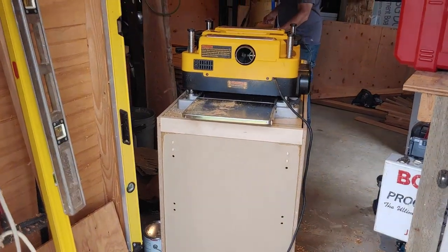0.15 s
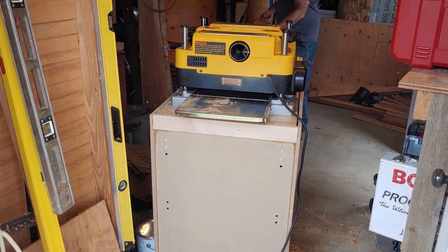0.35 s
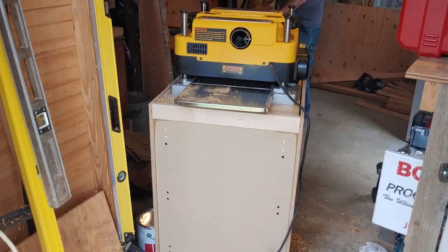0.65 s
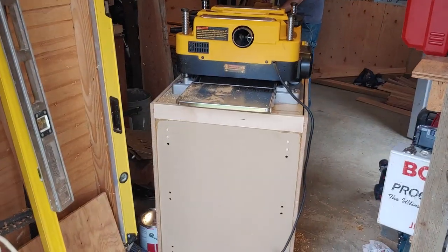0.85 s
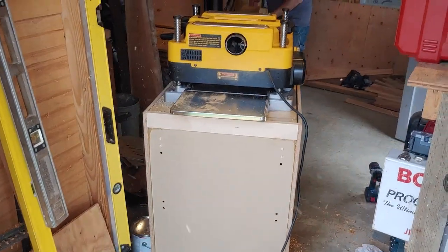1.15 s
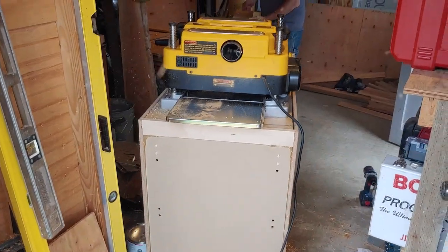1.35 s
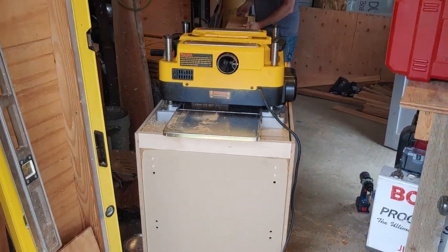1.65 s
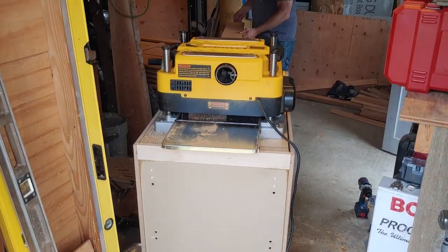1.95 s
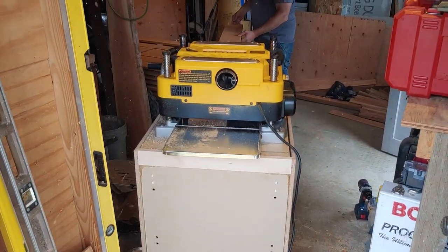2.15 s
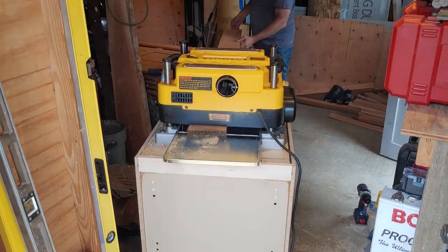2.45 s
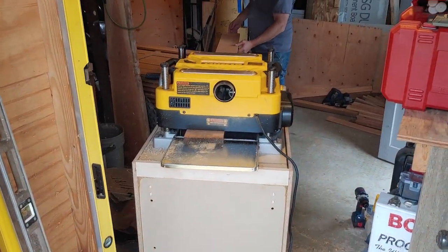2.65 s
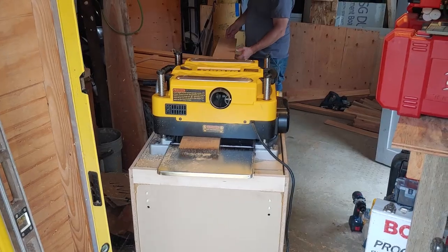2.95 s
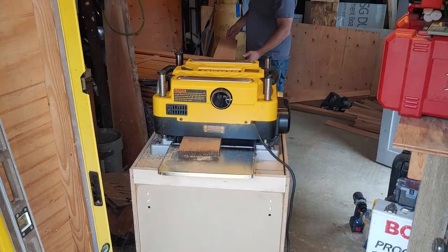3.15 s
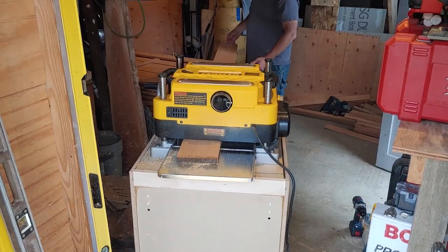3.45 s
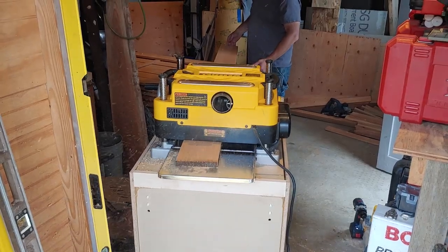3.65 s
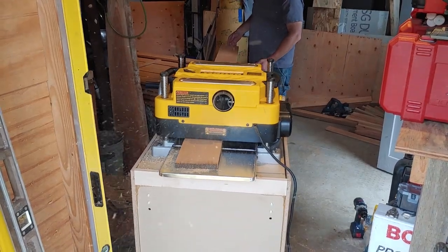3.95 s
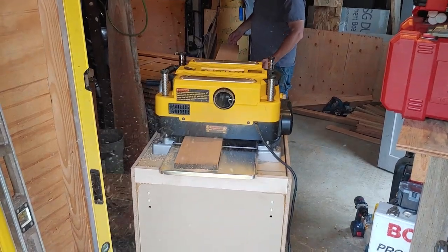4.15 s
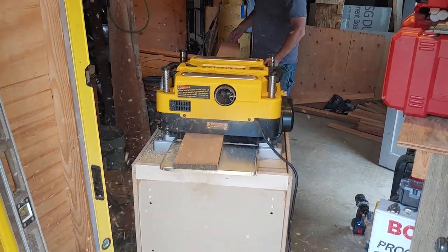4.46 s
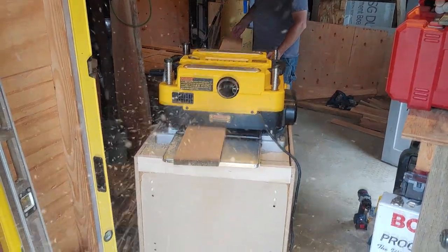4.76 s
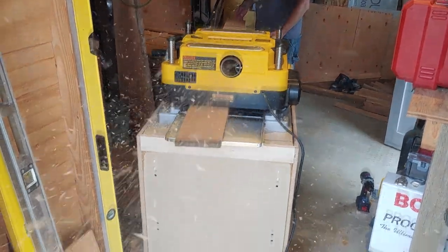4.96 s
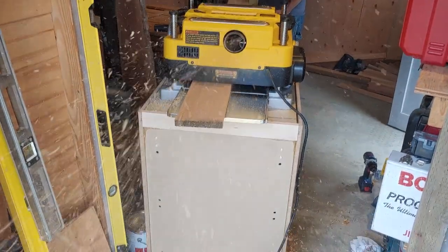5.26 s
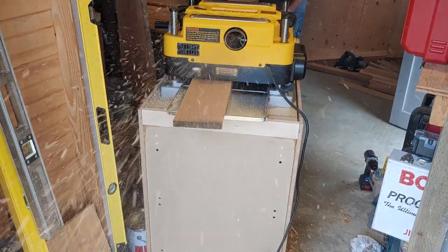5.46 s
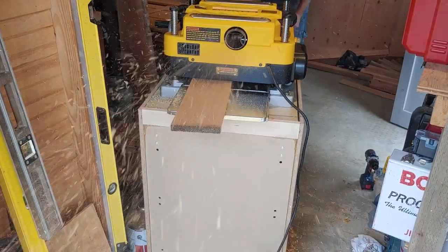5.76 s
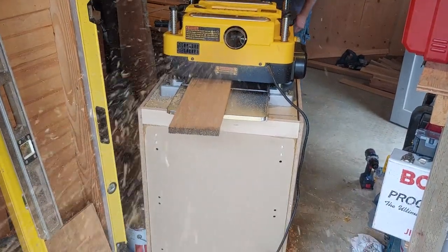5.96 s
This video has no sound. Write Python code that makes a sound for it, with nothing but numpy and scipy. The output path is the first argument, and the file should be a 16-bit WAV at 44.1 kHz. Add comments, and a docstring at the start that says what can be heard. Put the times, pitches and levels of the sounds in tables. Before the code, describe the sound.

Siren-like planer howl with hissing air, dropping lower and growing harsher after three seconds as knives chew into wood and chips patter.

```python
"""A benchtop thickness planer sings in a garage, a couple of metres from a hand-held stereo phone.
The siren is the three-knife cutter head chopping air: sines locked to the shaft's turns.
After 3.3 s a board meets the knives: the speed sags, the belt creeps, shaft orders buzz, noise rasps.
Behind it the motor and fan whine (sines), chips patter (random clicks), and the blower hisses
and draughts rumble (filtered noise). Levels and stereo balance shift as the phone turns and drifts."""
import sys
import numpy as np
from scipy import signal
from scipy.fft import rfft, irfft, next_fast_len
from scipy.io import wavfile
from scipy.ndimage import map_coordinates

SR = 44100
rng = np.random.default_rng(int(sys.argv[2]) if len(sys.argv) > 2 else 0)


def log_audio(samples):
    """Write samples as a 16-bit WAV file to the path given in sys.argv[1]."""
    # one column per channel
    frames = np.atleast_2d(samples).T
    # limit to full scale, then quantise
    limited = np.clip(frames, -1, 1)
    pcm = np.round(limited * 32767).astype(np.int16)
    wavfile.write(sys.argv[1], SR, pcm)


N = 269451
TIME = np.arange(N) / SR
PADDED = next_fast_len(N, real=True)
FREQ = np.arange(PADDED // 2 + 1) * SR / PADDED + 1e-3  # Hz, kept off zero for the divisions

# In every table, balance/dB is left minus right at the microphones.
# Knife-passing tone at the phone, before the siren's own lift: [t/s, level/dB, balance/dB]
SIREN_LEVEL = [(0.0, -35, -1), (0.22, -30, 1.5), (0.71, -31.5, 0.5), (1.29, -36.5, -11), (2.01, -35, 2.5),
               (2.47, -32, 4), (3.62, -30.5, 4.0), (3.86, -29.5, 0.5), (4.17, -33.5, -2), (4.49, -32, 2.5),
               (4.93, -31, 0.0), (5.14, -32, 1.5), (6.11, -34.5, -0.5)]
# Its overtones: [multiple of the turn rate, level/dB running free, added level/dB at full load,
# balance/dB, left lead/rad]
KNIFE_OVERTONES = [(6, -55, 9.5, 7, -0.31), (9, -57, 14, 5, 1.03), (12, -53.5, -2, -2.5, 1.24),
                   (16, -63.5, 7, -0.5, -0.06), (18, -73, 7, 7, 0.081)]
# Rattle of the idling head: [multiple of the turn rate, level/dB]
IDLE_RATTLE = [(2, -76), (5, -69), (7, -67), (10, -71), (13, -54.5), (15, -58.5)]
CLICK_S = .6066  # the siren's tone jumps in its cycle here, with a soft low click
SKIP_CYCLES, SKIP_S = -.35, .00025  # size of the skip, and how quickly it happens


def cutter_head(turns, load, siren_db=1.93):
    """Three knives chop the air past the table gap on every turn, making a siren and its overtones."""
    db, pan_db = curves(SIREN_LEVEL)
    db = db + siren_db + 0.54 * walk(46)
    knife_passes = 3 * turns + SKIP_CYCLES * ease(CLICK_S, SKIP_S)
    siren = pan(pan_db) * tone(knife_passes, db, lead=-.85)
    # the head's imbalance hums once a turn, clearest at first
    imbalance = tone(turns, np.interp(TIME, [1.3, 2.2], [-66, -80]))
    overtones = partials(turns, KNIFE_OVERTONES, load, shake(depth=.17, rate_hz=18))
    rattle = stack(turns, IDLE_RATTLE, shake(depth=.45, rate_hz=10))
    return siren + imbalance + overtones + (1 - load ** 2) * rattle


# Buzz of unequal knives in the wood, before the bite scales it: [multiple of the turn rate, level/dB]
KNIFE_BUZZ = [(4, -42), (5, -65.5), (7, -57), (8, -65), (10, -68), (13, -59), (15, -54), (17, -64),
              (19, -54.5), (20, -59), (21, -49), (22, -54.5), (24, -60), (25, -51.5), (26, -50), (27, -58),
              (28, -61), (30, -59), (31, -58), (36, -49), (39, -67)]
# The grain tears: [t/s, half length/s, level/dB]
GRAIN_TEARS = [(4.03, .025, -49), (4.235, 0.05, -42.5), (4.36, .04, -49), (4.64, 0.04, -40.5),
               (4.72, .035, -41), (4.87, .04, -48)]
BOARD_HZ, BOARD_WIDTH_HZ = 2080, 400  # ring of the board under the knives


def cut(turns, bite, load):
    """Knives hit the board: a buzz, and a rasp after each blow in the ring of board and housing."""
    buzz = stack(turns, KNIFE_BUZZ, shake(depth=.36, rate_hz=12), brightness=load)
    since_blow = (3 * turns) % 1  # share of the knife spacing
    after_blow = np.exp(-since_blow / 0.4)
    tearing = rng.standard_normal((2, N)) * after_blow * undb(3.2 * walk(45))
    rasp = unit(colour(tearing, resonance(BOARD_HZ, BOARD_WIDTH_HZ) ** 2))
    torn = sum(undb(db) * np.exp(-((TIME - s) / half_s) ** 2) for s, half_s, db in GRAIN_TEARS)
    # towards full load the housing rattles under the blows too
    growl = unit(colour(tearing, resonance(3320, 900) ** 2))
    return bite * buzz + (bite * undb(-57) + torn) * rasp + load ** 4 * undb(-58) * growl


# Motor partials: [multiple of the motor's turn rate, level/dB running free, added level/dB at full load,
# balance/dB, left lead/rad]
MOTOR_ORDERS = [(4, -64.5, 9, 2.5, 1.35), (8, -59, 17, -5.5, 0.32), (16, -66, 13, -8, 1)]
# Motor fan's whine in the standing waves: [t/s, left level/dB, right level/dB]
FAN_WHINE = [(0.0, -51, -52), (.18, -62, -56), (.4, -46, -50), (0.54, -50, -44), (0.7, -60, -60),
             (0.87, -42, -52), (1.0, -54, -52), (1.2, -50, -41), (1.28, -43, -44), (1.38, -36, -41),
             (1.5, -43, -42), (1.65, -60, -54), (1.84, -38, -39), (1.93, -36.5, -41), (2.07, -56, -42),
             (2.16, -52, -52), (2.24, -36.5, -54), (2.61, -40, -57), (2.8, -38, -43), (2.89, -40, -47),
             (2.96, -52, -52), (3, -47, -51), (3.07, -62, -56), (3.25, -42, -49), (3.45, -62, -59),
             (4.14, -56, -59), (4.24, -41, -59), (4.57, -51, -45), (4.86, -48, -59), (4.98, -38.5, -57),
             (5.37, -47, -59), (5.59, -40.5, -61), (6.04, -42, -59), (6.1, -44, -61)]
# mains hum once the phone has turned, its rise at full load, and its rise before the turn
MAINS_DB, MAINS_LOAD_DB, MAINS_AWAY_DB = -74, 10.5, 8
# the phone turns towards the machine: when, and how quickly (the rush uses both)
TURN_S, TURN_LENGTH_S = 0.58, 0.24


def motor(turns, load, gearing):
    """The armature's orders, its cooling fan's whine, and mains hum that grows with the load."""
    once_a_turn = tone(turns, -62.0, flutter=shake(depth=0.18, rate_hz=7.8))
    orders = partials(turns, MOTOR_ORDERS, load, shake(depth=.28, rate_hz=38.0), gearing)
    blades = 21 * turns
    fan = tone(blades, np.array(curves(FAN_WHINE)), lead=1.95, flutter=shake(depth=0.27, rate_hz=11))
    hum_db = MAINS_DB + MAINS_LOAD_DB * load ** 3 + MAINS_AWAY_DB * (1 - ease(TURN_S, 0.32))
    hum = tone(120 * TIME, hum_db, flutter=shake(depth=0.41, rate_hz=5.3))
    return once_a_turn + orders + fan + hum


def chips(bite, per_second=250):
    """Shavings patter on the floor and the door: random clicks, denser with the bite, through a resonance."""
    hits = (rng.random((2, N)) < bite * per_second / SR) * rng.standard_normal((2, N))
    return undb(-78) * unit(colour(hits, resonance(4400, 4000)))


# Rush of air and bearings, before the bands below: [f/Hz, left level/dB per Hz, right level/dB per Hz]
RUSH_SPECTRUM = [(30.0, -102, -107), (190, -97.5, -87.5), (267, -72.5, -87.5), (403, -99, -75.5),
                 (640, -93, -79), (697, -84, -80), (770, -80, -89), (1370, -80, -74), (1650, -80.5, -85.5),
                 (2050, -75.5, -73.5), (2320, -75, -79.5), (2740, -77.5, -82), (2870, -80.5, -78.5),
                 (3500, -76, -83.5), (4000, -76.5, -81.5), (4970, -73.5, -88.5), (6360, -73, -78),
                 (7030, -74, -78.5), (7800, -79.5, -69), (8500, -77.5, -70), (9300, -81, -71.5),
                 (11550, -83.5, -73), (12000, -85, -79.5), (13160, -84, -82.5), (15800, -99, -102)]
# Level of the whole rush as the phone moves: [t/s, level/dB]
RUSH_MOVES = [(0, 3), (.55, 0.5), (.95, -0.5), (2.2, 0), (2.9, -1.65), (3.8, -3), (4.25, -1.7), (4.9, -4),
              (5.4, -2), (6.1, -2.5)]
# Housing, rasp, blower, three bands of hiss: [centre f/Hz, level/dB, added level/dB at full load,
# balance/dB, added level/dB before the phone turns, added balance/dB before it turns]
RUSH_BANDS = [(1200, -1.5, 5.4, 3.5, 2.5, -2), (2180, 2.5, 0.5, -4.5, -11, 5),
              (4220, 3.5, 2.1, -7, -4.5, 12.5), (5840, -0.5, 3.7, -2, 0.5, -3.5),
              (7600, -0.5, 1.7, 0.9, -2.5, -11), (11100, .5, 0.38, -0.5, -4.5, 5.5)]
TURBULENCE_DB = .5  # unsteadiness of each band


def air(load, likeness=0.16, lag_ms=0.056):
    """Turbulent rush of blower and housing; the bass is alike at both microphones, the treble diffuse."""
    log_f = np.log(FREQ)
    hz, *sides = np.transpose(RUSH_SPECTRUM)
    shape = np.array([undb(np.interp(log_f, np.log(hz), db)) for db in sides]) * np.sqrt(SR / 2)
    shared = np.clip(likeness + (1 - likeness) / (1 + (FREQ / 600) ** 2), 0, 1)
    lag = np.exp(1j * np.pi * FREQ * lag_ms / 1000 * np.array([[1], [-1]]))
    rush = colour(rng.standard_normal(N), shape * np.sqrt(shared) * lag)
    rush += colour(rng.standard_normal((2, N)), shape * np.sqrt(1 - shared))
    level_db = curves(RUSH_MOVES)[0]
    turned_away = 1 - ease(TURN_S, TURN_LENGTH_S)
    centres = np.log(np.transpose(RUSH_BANDS)[0])
    out = 0
    # each band is a triangle between its neighbours' centres; the outer two run on to the ends
    for row, peak in zip(RUSH_BANDS, np.eye(len(centres))):
        _, db, load_db, pan_db, away_db, away_pan_db = row
        db = db + level_db + load_db * load + away_db * turned_away + TURBULENCE_DB * walk(12)
        swell = undb(db) * pan(pan_db + away_pan_db * turned_away)
        out = out + colour(rush, np.interp(log_f, centres, peak)) * swell
    return out


# Narrow rings in the rush, heard from some places only: [from t/s, to t/s, from f/Hz, to f/Hz,
# width f/Hz, level/dB, balance/dB]
RUSH_RINGS = [(-.2, .6, 3950, 3880, 200, -46, 9), (.35, .47, 4200, 4150, 400, -51, 4),
              (-.2, .36, 7750, 8100, 700, -44, -14), (.17, .27, 8150, 8300, 700, -46, -14),
              (.36, .62, 10950, 10750, 650, -49, -14), (.63, .82, 8350, 8200, 400, -46, -14),
              (.71, .84, 11500, 10900, 700, -49, -14), (.85, 1.1, 7600, 7250, 750, -41, -10),
              (1.1, 1.33, 7150, 6850, 450, -46, -8), (1.14, 1.36, 10450, 9900, 550, -44, -14),
              (1.36, 1.67, 9550, 9400, 360, -45, -14), (1.6, 2.2, 8100, 7850, 500, -46, -12),
              (1.7, 2.12, 11000, 10500, 550, -48, -14), (2.15, 2.75, 9250, 8750, 500, -51, -14),
              (.7, 2.6, 7550, 7450, 300, -51, 10), (1.2, 2.7, 7200, 7120, 280, -51, 8),
              (2.7, 4.35, 7220, 7100, 280, -51, 1), (2.05, 4.45, 5230, 5230, 230, -53, 13),
              (2.9, 3.65, 8030, 8030, 250, -51, -10), (1.1, 1.8, 2600, 2600, 200, -50.5, 4),
              (1.9, 4.0, 2420, 2400, 160, -53, 2), (1.88, 2.12, 2480, 2460, 110, -51, -3),
              (.38, 2, 3050, 3120, 260, -54, -8), (1.2, 1.7, 4970, 4900, 280, -52, 6),
              (.63, .85, 5600, 5200, 500, -51, -4), (1.48, 1.8, 5780, 5740, 220, -52, 12),
              (1.7, 2.15, 4470, 4430, 170, -54, 12)]


def rings(fade_s=0.05):
    """The rush rings in narrow bands of noise that come, glide and go as the phone moves."""
    out = 0
    for start, end, from_hz, to_hz, width_hz, db, pan_db in RUSH_RINGS:
        heard = np.clip(np.minimum(TIME - start, end - TIME) / fade_s + .5, 0, 1)
        phase = 2 * np.pi * np.cumsum(np.interp(TIME, [start, end], [from_hz, to_hz])) / SR
        a, b = walk(width_hz / 2, channels=2)
        band = a * np.cos(phase) + b * np.sin(phase)
        out = out + band * heard * undb(db) * pan(np.array([pan_db]))
    return out


# Close reflection of the hiss at the right microphone: [t/s, delay/ms, gain]
RIGHT_ECHO = [(0, 0.28, 0.34), (.13, 0.29, .4), (.2, 0.24, 0.45), (.35, 0.27, 0.21), (.47, 0.16, 0.28),
              (.6, 0.19, 0.36), (.7, 0.26, 0.49), (.81, 0.29, 0.38), (.87, 0.22, 0.21), (1.0, 0.23, 0.46),
              (1.2, 0.293, 0.26), (1.5, 0.34, 0.25), (2.0, 0.37, 0.22), (2.4, 0.51, 0.14),
              (3.2, 0.4, 0.072)]
WALL_MS, WALL_GAIN = 0.96, 0.16  # a still surface on the left, heard from about 1.8 s


def reflection(hiss):
    """Nearby surfaces comb the treble: still on the left; on the right the ridges sweep with the phone."""
    left_path = (WALL_MS, WALL_GAIN * ease(1.8, .2), 1500)  # delay/ms, gain, lowest f/Hz
    right_path = (*curves(RIGHT_ECHO), 3500)
    out = []
    for side, (ms, gain, hz) in zip(hiss, [left_path, right_path]):
        treble = colour(side, 1 / (1 + (hz / FREQ) ** 4))
        echo = map_coordinates(treble, [np.arange(N) - ms * SR / 1000], order=3)
        out.append(side - treble + (treble + gain * echo) / np.sqrt(1 + gain ** 2))
    return np.array(out)


def garage(x, wall_db=-9, count=6):
    """Short echoes off doors and benches ripple the upper spectrum; their paths drift with the phone."""
    upper = colour(x, 1 / (1 + (1200 / FREQ) ** 4))
    echoes = np.zeros((2, N))
    for side in range(2):
        for place, drift in rng.random((count, 2)):
            delay_ms = 2 + 14 * place + 0.126 * (drift - .5) * TIME
            echoes[side] += map_coordinates(upper[side], [np.arange(N) - delay_ms * SR / 1000], order=2)
    return x + undb(wall_db) * echoes / np.sqrt(count)


# Draughts on the microphone: [t/s, peak level/dB of the rumble before panning]
DRAUGHT_GUSTS = [(1.19, -60), (1.42, -56), (1.49, -63), (1.59, -63), (3.42, -65), (4.44, -51), (4.5, -51),
                 (4.63, -52), (4.72, -55), (4.82, -58), (4.92, -54), (5.05, -65), (5.15, -62)]
GUST_ATTACK_S, GUST_DECAY_S = 0.035, 0.027
DRAUGHT_DB, DRAUGHT_LOAD_DB = -73.5, 4.5  # steady draught, and its rise at full load


def draughts(load):
    """Moving air buffets the microphones, mostly the left: low noise under a steady draught and gusts."""
    rumble = unit(colour(rng.standard_normal((2, N)), resonance(61, 120) ** 2))
    draught = undb(DRAUGHT_DB + DRAUGHT_LOAD_DB * load)
    for s, db in DRAUGHT_GUSTS:
        away = np.maximum((s - TIME) / GUST_ATTACK_S, (TIME - s) / GUST_DECAY_S)
        draught = draught + undb(db) * np.exp(-away)
    return rumble * draught * pan(np.array([9.]))


def click(peak_db=-30, width_ms=.5, hz=200):
    """One soft low click, alike at both microphones: a low cosine under a very short bell-shaped swell."""
    since = TIME - CLICK_S
    swell = np.exp(-.5 * (since * 1000 / width_ms) ** 2)
    return -undb(peak_db) * swell * np.cos(2 * np.pi * hz * since)


# The phone drifts through a loud spot (+) or a null (-) of one partial:
# [multiple of the cutter's turn rate, t/s, half length/s, gain/dB, added balance/dB]
SPOTS_AND_NULLS = [(6, 1.69, 0.48, 8, 1), (6, 2.84, 0.48, 9.5, -6), (6, 3.895, 0.8, 13, -7),
                   (6, 5, .2, -5, -3), (6, 2.25, .3, 0, -9), (9, 0.48, 0.66, -5, 2),
                   (9, 1.99, 0.69, 10.5, 12), (9, 3.29, 0.57, 8.5, -11), (9, 3.8, 0.12, -7, -11),
                   (9, 3.6, 0.15, 5, 10), (9, 4.25, .15, 5, 3), (9, 4.7, 0.23, -5, -2),
                   (12, 1.17, 0.22, -28, -5), (12, 2.83, 1.3, 9, -2), (12, 3.9, 0.14, -11, -2),
                   (12, 4.9, .17, 8.5, 2), (12, 5.42, 0.29, -6, 4), (12, 5.85, .25, 5, -2),
                   (16, 4.35, 0.36, 17, 0), (16, 6.03, .15, 6, 0), (18, 4.86, 0.17, 15, -5),
                   (7.8, .1, 1.5, 16.5, 6), (15.7, 5.07, .08, -5, 4), (15.7, 5.3, .2, 4, 0),
                   (15.7, 5.9, .35, 2, 0), (4, 4.3, .3, 3.5, 0), (31.2, 4.9, .5, -7, 0),
                   (25, 5.3, .25, 5, 0), (5, 5.75, .4, 10, 0), (10, 5.85, .3, 9, 0), (13, 5.3, .2, 10, 0),
                   (19, 4.75, .3, 8, 0), (19, 6.03, .18, 12, -3), (22, 5.72, .2, 7, 3),
                   (24, 5.6, .6, 12, -1), (26, 4.6, .2, 10, 0), (27, 5.85, .35, 11.5, 4),
                   (30, 6, .2, 11, 3), (31, 5.35, .15, 8, 0)]


def standing(multiple):
    """Level and balance (dB) of one partial as the phone drifts through its loud spots and nulls."""
    db, pan_db = np.zeros(N), np.zeros(N)
    for which, s, half_s, gain_db, side_db in SPOTS_AND_NULLS:
        if abs(which - multiple) < .15:
            inside = np.exp(-((TIME - s) / half_s) ** 2)
            db, pan_db = db + gain_db * inside, pan_db + side_db * inside
    return db, pan_db


# between those spots partials fade in the standing waves: spread for strong orders and for stacks, rate
FADE_DB, STACK_FADE_DB, FADE_HZ = 1.6, 2.3, 1.57


def partials(turns, table, load, flutter, gearing=1):
    """Strong shaft orders grow with the load and swell and fade in the room's standing waves."""
    out, fade = 0, walk(FADE_HZ, channels=2)
    for order, db, load_db, pan_db, lead in table:
        spot_db, side_db = standing(order * gearing)
        own_fade = np.roll(fade, rng.integers(N), axis=1)
        own_flutter = np.roll(flutter, rng.integers(N), axis=1)
        db = db + load_db * load + spot_db + FADE_DB * own_fade
        out = out + pan(pan_db + side_db) * tone(order * turns + rng.random(), db, lead, own_flutter)
    return out


def stack(turns, orders, flutter, brightness=1):
    """Shaft orders that flutter and fade each on their own, the higher ones more."""
    out, fade = 0, undb(STACK_FADE_DB * walk(FADE_HZ, channels=2))
    for order, db in orders:
        share = min(order / 16, 1)
        spot_db, pan_db = standing(order)
        own_flutter = share * np.roll(flutter, rng.integers(N), axis=1)
        own_fade = 1 + share * (np.roll(fade, rng.integers(N), axis=1) - 1)
        lead = share * rng.uniform(-1.4, 4.8)
        partial = tone(order * turns + rng.random(), db + spot_db, lead, own_flutter)
        out = out + pan(pan_db) * own_fade * brightness ** share * partial
    return out


def tone(turns, db, lead=0., flutter=0.):
    """A partial of given rms before flutter; it reaches the left microphone a phase `lead` earlier."""
    phase = 2 * np.pi * turns + np.array([[lead], [-lead]]) / 2
    return np.sqrt(2) * undb(db) * np.real((1 + flutter) * np.exp(1j * phase))


def shake(depth, rate_hz):
    """Random flutter of a partial's size and phase, different at each microphone."""
    return depth * (walk(rate_hz, channels=2) + 1j * walk(rate_hz, channels=2))


def walk(rate_hz, channels=1):
    """Slow random wander of spread 1."""
    return unit(colour(rng.standard_normal((channels, N)), 1 / (1 + (FREQ / rate_hz) ** 2)))


def resonance(hz, width_hz):
    """Response of one damped resonance."""
    return 1 / (1 + 1j * (FREQ ** 2 - hz ** 2) / (FREQ * width_hz))


def colour(x, gain):
    """Filter by a gain at each frequency."""
    return irfft(rfft(x, PADDED) * gain, PADDED)[..., :N]


def unit(x):
    """Scale to rms 1."""
    return x / np.sqrt(np.mean(x ** 2))


def pan(db):
    """Left and right gains of constant power."""
    gains = undb(np.array([db, -db]) / 2)
    return gains / np.sqrt(np.mean(gains ** 2, axis=0))


def undb(db):
    """Decibels to gain."""
    return 10 ** (np.asarray(db) / 20)


def curves(table):
    """The columns of a table, joined by straight lines in time."""
    s, *columns = np.transpose(table)
    return [np.interp(TIME, s, c) for c in columns]


def ease(s, length_s):
    """A smooth move from 0 to 1 around a moment."""
    return .5 + .5 * np.tanh((TIME - s) / length_s / 2)


# Cutter head's speed, before a slight random wander: [t/s, turn rate f/Hz]
SHAFT_SPEED = [(0, 159.7), (.95, 159.2), (1.27, 158.5), (1.78, 158.6), (2.35, 157.4), (3.3, 157.35),
               (3.88, 152.8), (4.39, 148.6), (5.03, 141.9), (5.35, 139.6), (6.1, 138.3)]
# motor turns per cutter turn running free, the limit of what creep adds, and the load scale of its levelling
BELT_RATIO, BELT_CREEP, CREEP_LOAD = 1.9515, .0138, .45
# loads at which the knives touch the board and reach full depth, and the bite's level there
TOUCH_LOAD, DEEP_LOAD, BITE_DB = 0.11, 0.69, -3


def scene():
    """One shaft speed drives the machine; its sag is the load, which sets belt creep, bite and hum."""
    speed = curves(SHAFT_SPEED)[0]
    load = (speed.max() - speed) / np.ptp(speed)  # 0 at the fastest, 1 at the slowest
    hz = speed * (1 + 0.00034 * walk(8.8)[0])
    turns = np.cumsum(hz) / SR
    gearing = BELT_RATIO + BELT_CREEP * np.tanh(load / CREEP_LOAD)
    motor_turns = np.cumsum(hz * gearing) / SR
    depth = np.clip((load - TOUCH_LOAD) / (DEEP_LOAD - TOUCH_LOAD), 0, 1)
    bite = undb(BITE_DB) * depth ** 1.7
    machine = cutter_head(turns, load) + cut(turns, bite, load) + motor(motor_turns, load, BELT_RATIO)
    rush = garage(reflection(air(load))) + rings()
    return machine + chips(bite) + rush + draughts(load) + click()


def record(dry, top_hz=15700):
    """The phone cuts the top: a steep low-pass."""
    return signal.sosfilt(signal.ellip(10, .1, 80, top_hz, fs=SR, output="sos"), dry)


dry = scene()
out = record(dry)
log_audio(out)
```